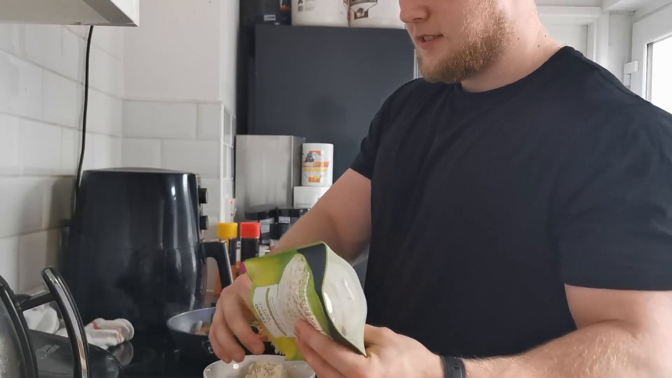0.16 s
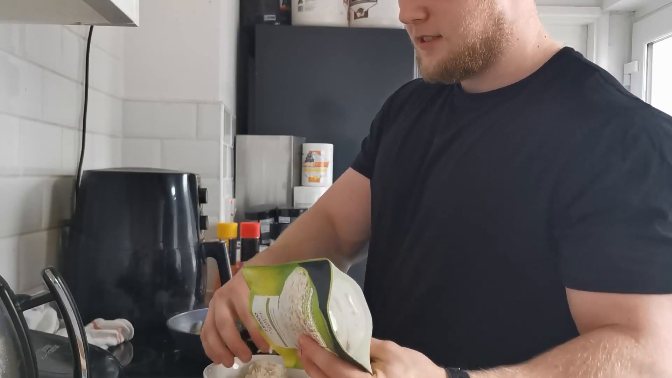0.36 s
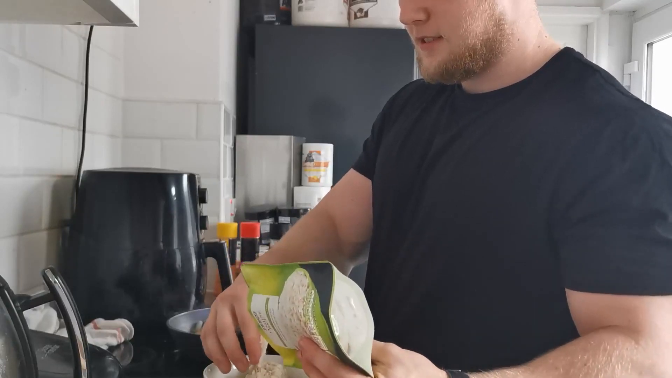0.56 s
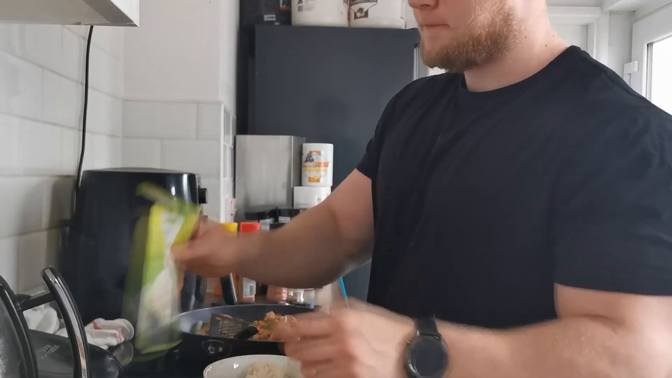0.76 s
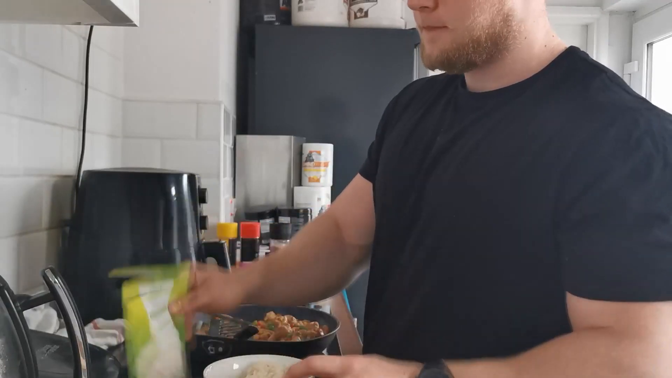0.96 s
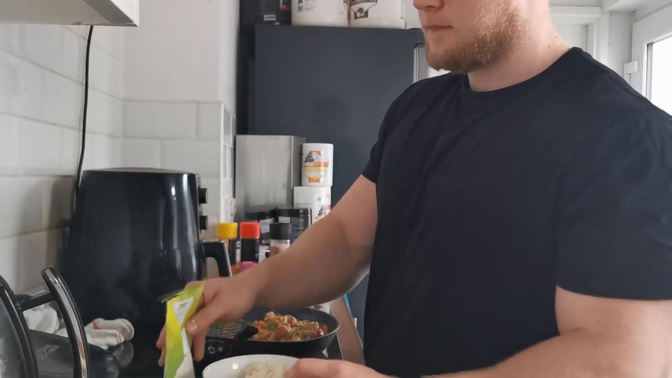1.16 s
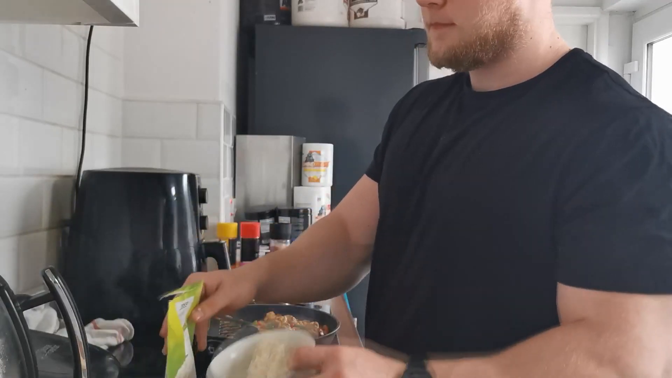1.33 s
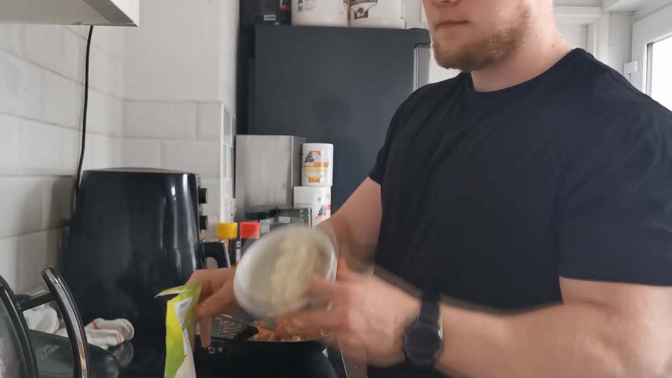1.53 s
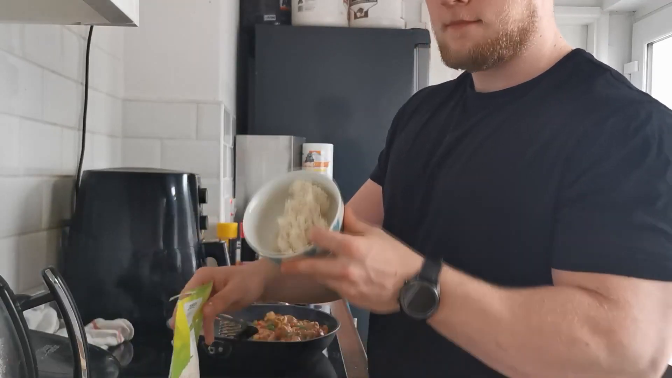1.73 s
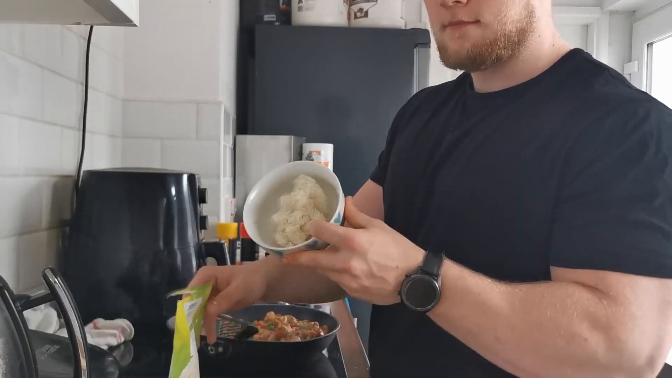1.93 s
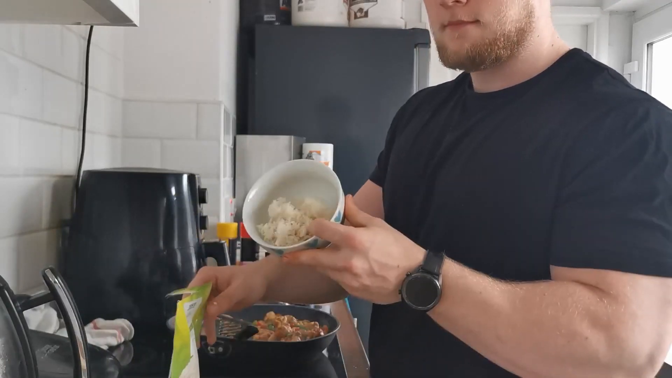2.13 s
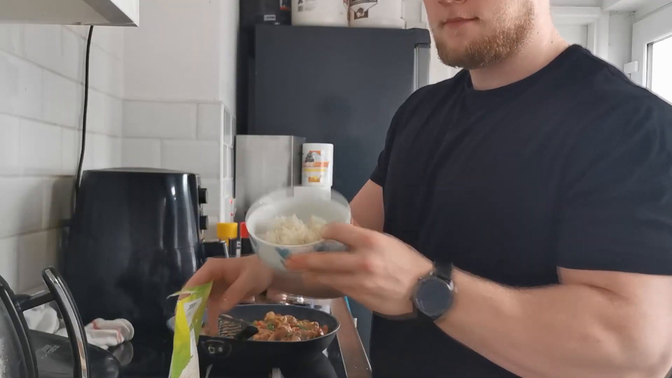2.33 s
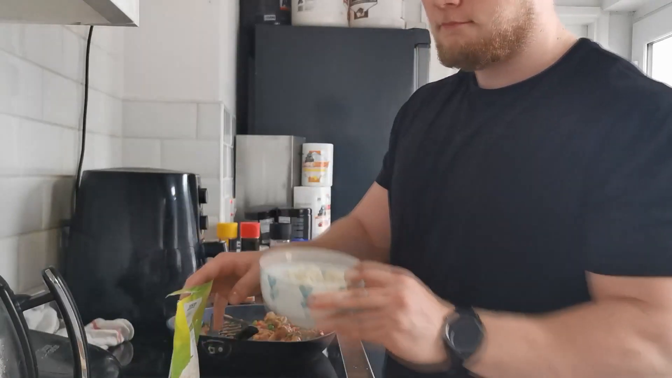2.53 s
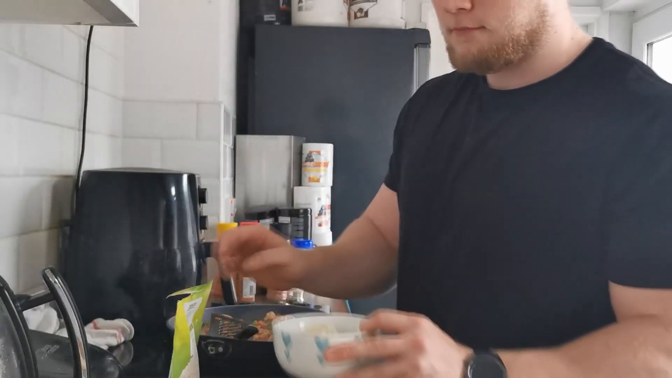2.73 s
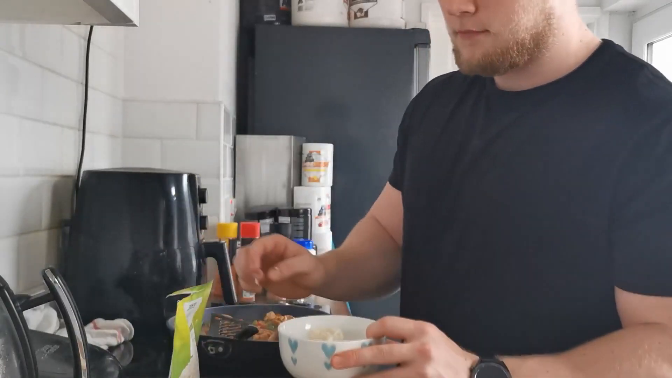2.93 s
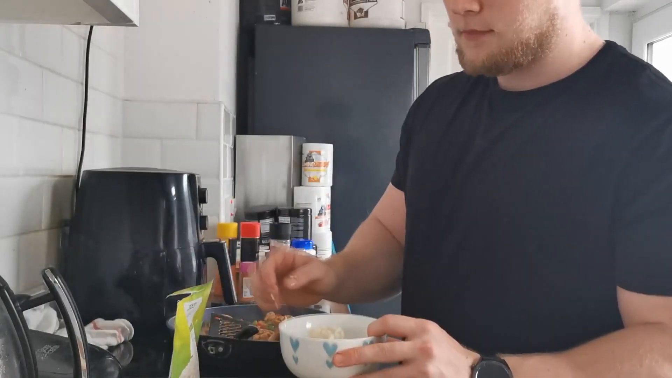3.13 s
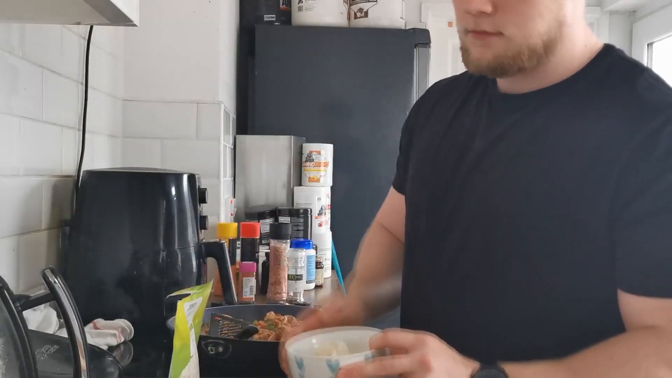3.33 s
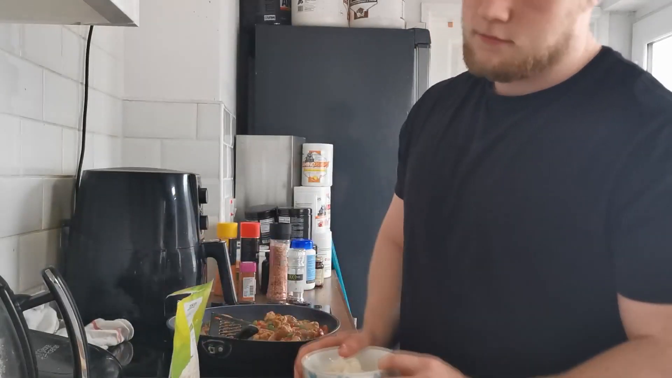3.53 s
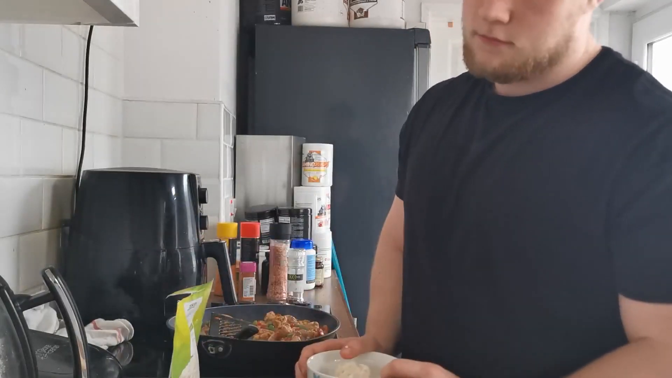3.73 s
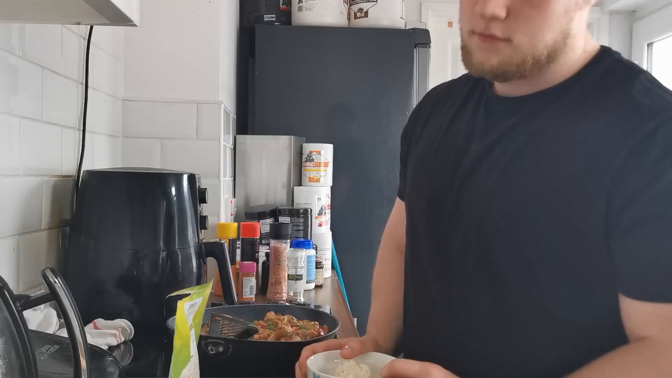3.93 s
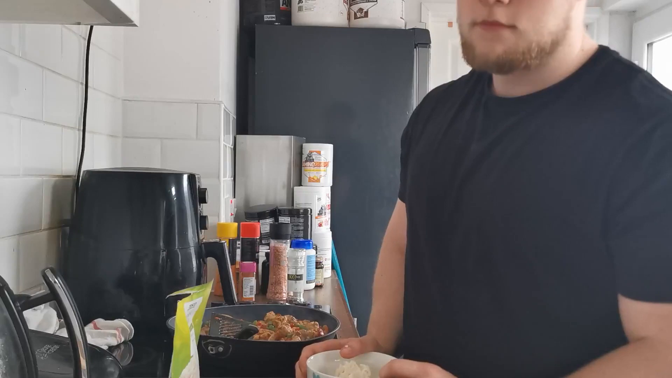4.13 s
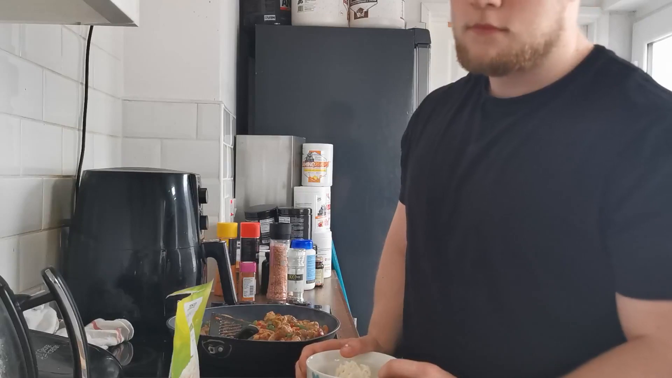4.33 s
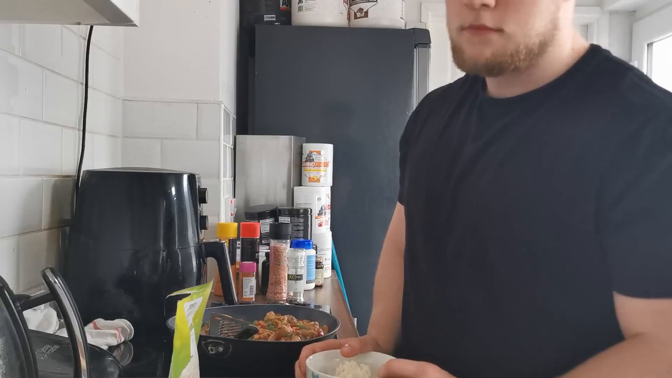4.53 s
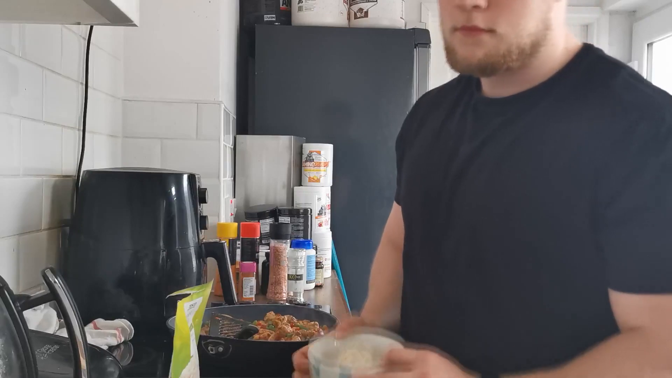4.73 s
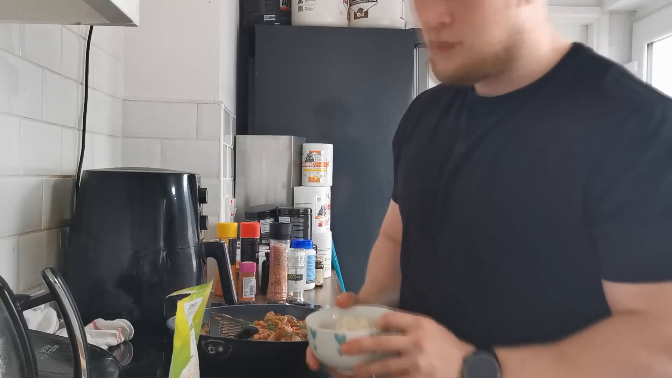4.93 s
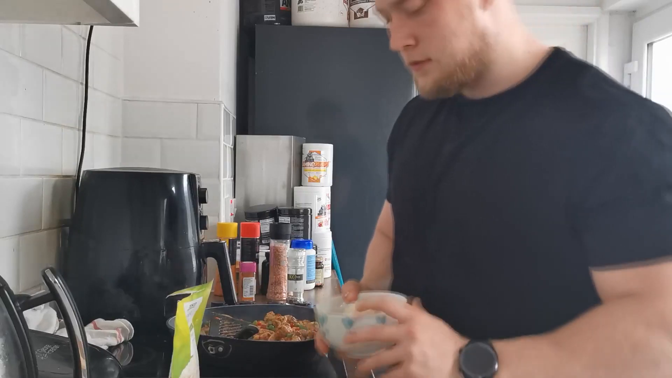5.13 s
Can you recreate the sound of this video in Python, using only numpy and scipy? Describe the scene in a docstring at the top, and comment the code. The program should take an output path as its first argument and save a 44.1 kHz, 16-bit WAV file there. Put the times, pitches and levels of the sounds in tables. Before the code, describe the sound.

Close in a tiled kitchen, a stiff plastic pouch snaps and crinkles in short irregular bursts, then bumps onto the worktop. Faint china and pan ticks follow during a quieter pause. A dense crackle and a heavy bowl thud come late, then near quiet. Low hob or fan hum continues throughout; stereo microphone nearby, right side brighter than left.

```python
"""First you hear rice squeezed out of a stiff plastic pouch in a tiled kitchen: folds snap, film rustles.
The pouch is shaken and stood on the worktop. A china bowl is tipped over a pan, then lands with a thud
amid crackling plastic. Plastic sounds are bursts of tiny clicks; worktop, bowl and pan are dying sines.
Behind them the hob hums and whines faintly: wavering sines over shaped noise. The two microphone ports
differ in colour."""
import sys
import numpy as np
from scipy import signal
from scipy.fft import rfft, irfft, next_fast_len
from scipy.io import wavfile
from scipy.ndimage import uniform_filter1d

SR = 44100
rng = np.random.default_rng(int(sys.argv[2]) if len(sys.argv) > 2 else 0)


def output_pcm(signal):
    """Save a mono or channel-first signal as 16-bit PCM at the path in sys.argv[1].

    Samples are clipped to [-1, 1] before scaling.
    """
    pcm = np.clip(np.atleast_2d(signal).T, -1, 1) * 32767
    wavfile.write(sys.argv[1], SR, np.round(pcm).astype(np.int16))


N = 227987
TIME = np.arange(N) / SR   # t/s

# ways a crease gives: (build-up t/s, fade t/s, first click level/dB)
FLIP = (0.0001, 0.00041, 0)
CRACK = (0.0004, 0.0015, -2.44)
CRUMPLE = (0.00081, 0.0092, -3)
CREEP = (0.0055, 0.0044, -14)
# snaps of creased film and short contacts of fingers and rice, each with two resonances:
# (t/s, level/dB, treble/dB, lower f/Hz, its level/dB, upper f/Hz, its level/dB, way it gives)
SNAPS = [(0.009, -25, 2, 1100, 1, 2200, 12, CRACK), (0.0284, -14.5, -31, 1820, 12.5, 2400, 12.5, CRACK),
         (0.0395, -13, -21, 1940, 6, 3000, 4, CRACK), (0.059, -8.5, -2, 1710, 11.5, 2250, 7.5, CRACK),
         (0.0705, -14, 10.5, 1600, 12.5, 2400, -3, CRACK), (0.080, -16, 6, 1400, -1, 3200, 8, FLIP),
         (0.093, -21, 13, 1900, 4, 4700, 2, CRACK), (0.131, -30, 4, 1300, 6, 2100, 7, CRACK),
         (0.1541, -17, 5, 1400, 10, 2550, 2, CRACK), (0.1909, -5.5, -1.5, 600, 0, 2150, 12.5, CRACK),
         (0.203, -21.5, 3, 800, 13, 2150, 3, CRACK), (0.233, -20, 7, 980, 7, 2000, 13, FLIP),
         (0.301, -18.5, -4, 890, 6, 2000, 11, CRUMPLE), (0.3728, -8.5, -7, 483, 10, 2750, 10, CRACK),
         (0.381, -15, -21, 1120, 14, 1650, 15.5, CRACK), (0.573, -39, 18.5, 2300, 10, 4700, 3, FLIP),
         (0.6752, -9, 6, 1470, 3, 2350, 9, CREEP), (0.695, -24, -1, 1300, 5, 2400, -4, CRACK),
         (0.7142, 2.5, 1.5, 1580, 9.5, 2300, 7, FLIP), (0.947, -18, -14, 1340, 4, 2120, 9, CREEP),
         (0.9695, -18.5, -12, 2250, 12, 4700, 6.5, CRACK), (0.989, -16.5, -8, 910, 9.5, 2050, 18.5, CRACK),
         (0.999, -18, -5, 2100, 6, 4600, 8, CRACK), (1.013, -32, -4, 2300, 13, 4700, 8, CRACK),
         (1.041, -14, 9, 540, 11, 2600, 13, CRUMPLE), (1.069, -14.5, 10, 1700, -5, 3300, 8, CRACK),
         (1.1345, -8, -15, 844, 6, 2200, 2, FLIP), (1.1652, 0, 9.5, 397, 10, 1850, 6.5, CRUMPLE),
         (1.173, -8, -11, 1620, 14.5, 2700, 19.5, CRACK), (1.183, -2.5, -1, 506, 9, 1700, 13.5, CRUMPLE),
         (1.201, -10, -13, 603, 1, 1750, 21, CRACK), (1.221, -6, -13, 1750, 6, 4300, 14, FLIP),
         (1.242, -11.5, -2, 1100, -1, 1850, 8, CRACK), (1.410, -27, -14, 770, 21, 1530, 20, CREEP),
         (1.426, -24, -13, 716, 17.5, 1260, 15, CRUMPLE), (1.903, -31.5, -12, 1610, 18, 2700, 6, CREEP),
         (2.5095, -18.5, -9, 2160, 17, 4700, 10, CRACK),
         (2.5315, -19.5, -13, 1910, 15, 2800, 16.5, CRUMPLE), (2.543, -15, 0, 1140, 13, 2000, 14.5, CREEP),
         (3.412, -13.5, -24, 1670, 11, 2250, 16, CRACK), (3.423, -11.5, -19, 2010, 12, 2650, 10.5, CRUMPLE),
         (3.442, -18, 4.5, 1490, -4, 2400, 14, CREEP), (3.6162, 6, -3, 835, 7.5, 1830, 11.5, CRACK),
         (3.6185, 2, -1, 1070, 11.5, 3100, 11, CRACK), (3.630, -1, 8.5, 960, 6, 2200, -2, CRUMPLE),
         (3.640, -5.5, -2, 910, 11, 3200, 5, FLIP), (3.654, -7, -2, 1000, 8, 2050, 11, CRACK),
         (3.669, -1.5, -9, 600, 5, 1050, 12, CRACK), (3.699, 3.5, -1, 900, 5, 2200, 3, CRACK),
         (3.7145, 1, 7, 800, -1, 2300, 1, CRUMPLE), (3.7185, 6, 0, 780, 9, 2000, 2, CRACK),
         (3.739, -2, 1, 860, 7, 2200, 3, CRACK), (3.777, 1, -21, 510, 15, 1600, 7, CRACK),
         (3.785, -3.5, 10.5, 990, 19.5, 10800, 12, CREEP), (3.790, -1, -8, 990, 6, 2100, 11, CRACK),
         (3.808, -4, 1, 604, 5, 2300, 8, CRACK), (3.8235, 1.5, 7.5, 700, -1, 1120, 6, CRACK),
         (3.8365, -0.5, 14, 2420, 10, 3800, 1, CRACK), (3.851, -3.5, 5, 900, 2, 2300, 6, CRACK),
         (5.151, -20.5, 24, 2510, 12, 4200, 18.5, CREEP), (5.1598, -21.5, 23, 1430, -5, 4200, 23, FLIP),
         (5.1648, -19, 22, 2410, 9, 3500, 24.5, CRACK)]
PANEL_Q = (4.3, 4.3)   # sharpness of the lower and upper resonance of the film beside a crease
BEAMED_SHARE = 0.22   # share of the panels' ring that bypasses the room

# film, fingers and rice rubbing: (start t/s, length t/s, level/dB, treble/dB)
RUBS = [(0, 0.0029, -37.5, -23), (0.067, 0.1, -43, -0.5), (0.233, 0.14, -50, -8),
        (0.67, 0.096, -52.5, 16.5), (0.965, 0.062, -41, -18), (1.025, 0.054, -36.5, -1),
        (1.154, 0.068, -30, -5.5), (1.239, 0.089, -41.5, -8.5), (1.374, 0.019, -49, -29),
        (1.54, 0.32, -80, 20), (1.861, 0.052, -52, -19), (2.26, 0.054, -62, -25), (2.541, 0.13, -53.5, -22),
        (3.608, 0.053, -33.5, 8.5), (3.792, 0.021, -25.5, 4), (3.863, 0.083, -39.5, 1.5),
        (4.86, 0.48, -81.5, 24)]
RUB_SWELL_SHARE = 0.28   # a rub swells over this share of its length, then holds
RUB_FADE_DB_PER_S = 294   # after its length it dies away at this rate
# larger buckles in a rub: range of pitches f/Hz, level/dB, sharpness
BUCKLE_HZ, BUCKLE_RING_DB, BUCKLE_Q = (1394, 4790), -11.5, 9.4
# what the film radiates: (f/Hz, level/dB)
FILM_COLOUR = [(40, -30), (150, -10), (350, -1), (550, -0.5), (800, -3), (1100, -6.5), (1700, -7.5),
               (2300, -9), (3200, -10), (5000, -8.5), (6800, -14.5), (10000, -17.5), (16000, -16)]

# what strikes the worktop: (brightness of the contact f/Hz, weight of the bass level/dB)
RICE, POUCH, BOWL_EDGE, BOWL_FOOT = (710, 13), (520, -10), (930, 13.2), (730, 0.65)
# blows on the worktop: (t/s, level/dB, what strikes)
KNOCKS = [(0.217, -52.5, RICE), (0.284, -52.5, RICE), (0.374, -47, POUCH), (0.714, -50, POUCH),
          (1.039, -32, POUCH), (1.046, -33, POUCH), (1.058, -40, POUCH), (1.167, -30, POUCH),
          (1.188, -36, POUCH), (3.617, -34.5, BOWL_EDGE), (3.666, -33, BOWL_EDGE),
          (3.697, -29.5, BOWL_FOOT), (3.720, -30, BOWL_FOOT), (3.7764, -15.5, BOWL_FOOT),
          (3.7834, -27, BOWL_FOOT), (3.801, -30, BOWL_FOOT), (3.821, -33.5, BOWL_EDGE)]
# ringing tones of the worktop with what stands on it, before the bass weight:
# (f/Hz, level/dB, time to fall 60 dB t/s)
WORKTOP_MODES = [(66, -7.5, 0.06), (82, -5, 0.05), (104.7, -9, 0.18), (135, -14.5, 0.23),
                 (179, -15.5, 0.13), (226, -1.5, 0.043), (286, -6.5, 0.07), (359, -2, 0.098),
                 (418, -7, 0.055), (489, 4, 0.039), (548, 1.5, 0.045), (671, -4.5, 0.054), (769, -5, 0.074),
                 (900, -6.5, 0.0224), (1050, -2.5, 0.045)]

# fingers on china: (t/s, level/dB)
BOWL_TOUCHES = [(2.303, -58.5), (2.318, -62), (2.39, -67)]
# ringing tones of the bowl: (f/Hz, level/dB, time to fall 60 dB t/s)
BOWL_MODES = [(1576, -12, 0.06), (3990, -1, 0.047), (7220, -13, 0.079)]
# light bumps against the pan: (t/s, level/dB)
PAN_TOUCHES = [(2.532, -49.5), (2.541, -59.5)]
# ringing tones of the pan: (f/Hz, level/dB, time to fall 60 dB t/s)
PAN_MODES = [(746, 1, 0.15), (1085.5, 0, 0.12), (1410, -7, 0.1), (1685, -6, 0.17), (1950, 0, 0.22),
             (2314, -17.5, 0.4), (2810, -11, 0.089)]

# how long the room rings: (f/Hz, time to fall 60 dB t/s)
ROOM_T60 = [(100, 0.46), (400, 0.28), (1000, 0.41), (2000, 0.35), (5000, 0.33), (10000, 0.28),
            (16000, 0.16)]
# left-right correlation of diffuse sound: (f/Hz, correlation from -1 to 1)
LIKENESS = [(110, 0.94), (190, 1), (300, 0.74), (600, 0.63), (1200, 0), (3000, 0)]
# lines of hob and fan, before a trim they share: (f/Hz, rms level/dB)
HUM_LINES = [(129.2, -68.5), (166.9, -68.5), (484.5, -73), (667.5, -80.5), (4086, -79.5)]
# kitchen air and cooling fan, before the ports' colour: (f/Hz, level per Hz/dB)
AIR_COLOUR = [(15, -95), (28, -100), (45, -77.5), (60, -100), (84, -86.5), (105, -85), (175, -81.5),
              (270, -90), (520, -96.5), (850, -104), (1500, -110), (4200, -111), (6500, -116),
              (13300, -118), (14300, -134)]
# colour of the left microphone port: (f/Hz, level/dB)
LEFT_PORT = [(200, -2.5), (320, -6.5), (560, -6.5), (1000, -1.5), (2200, -2.5), (4000, -2), (8200, 2),
             (10000, -8), (12500, -13.5), (16000, -26)]
# colour of the right microphone port: (f/Hz, level/dB)
RIGHT_PORT = [(200, -2), (320, -3), (620, 2.5), (2200, 4.5), (4000, 0.5), (7300, -0.5), (9100, 14.5),
              (9900, 12), (10800, 11.5), (12200, 3.5), (16000, -7)]
CUTOFF_HZ = 16100   # the ports' sound is cut above this


def snaps(scatter_s=0.003, straight_db=-7, ring_db=1.0):
    """A crease gives in a dying run of small buckles and rings the panels beside it; cracks, rings apart."""
    cracks, rings = np.zeros((2, N)), np.zeros((2, N))
    age = TIME[:SR // 10]
    for s, level_db, treble_db, low_hz, low_db, high_hz, high_db, (build_s, fade_s, first_db) in SNAPS:
        run = (1 - np.exp(-age / build_s)) * np.exp(-age / fade_s)
        force = unit_energy(crackle(len(age), per_s=3200, spread_db=5) * run + 1e-18)
        force[0] += from_db(first_db)
        # every crease faces its own way and reaches the ports by its own close reflections
        paths = unit_energy(diffuse(len(age)) * np.exp(-age / scatter_s))
        paths[:, 0] += from_db(straight_db)
        heard = signal.fftconvolve(force[None], paths, axes=1)[:, :len(age)]
        crack = from_db(level_db) * evened(heard)
        low_panel = from_db(low_db) * resonance(crack, low_hz, PANEL_Q[0])
        high_panel = from_db(high_db) * resonance(crack, high_hz, PANEL_Q[1])
        # half the treble change, twice: a steeper step
        half_bright = brightened(crack, treble_db / 2)
        add(cracks, s, brightened(half_bright, treble_db / 2))
        add(rings, s, from_db(ring_db) * (low_panel + high_panel))
    return cracks, rings


def rustle(per_s=380, spread_db=3, buckles_per_s=22):
    """Sliding film sheds small buckles, some heard alike at both ports; larger ones ring a panel each."""
    both, left, right = (crackle(N, per_s, spread_db) for _ in range(3))
    grains = both / 2 + np.array([left, right]) * np.sqrt(3) / 2
    rings = np.zeros(N)
    for hz in np.geomspace(*BUCKLE_HZ, 10):
        rings += resonance(crackle(N, buckles_per_s, spread_db), hz, BUCKLE_Q)
    grains = grains + from_db(BUCKLE_RING_DB) * rings / np.std(rings)
    out = np.zeros((2, N))
    for s, length, level_db, treble_db in RUBS:
        swell = np.clip((TIME - s) / (RUB_SWELL_SHARE * length), 0, 1)
        fade_db = RUB_FADE_DB_PER_S * np.clip(TIME - s - length, 0, 1)
        out += swell * from_db(level_db - fade_db) * brightened(grains, treble_db)
    return out


def knocks(bass_hz=200):
    """A soft blow sets the worktop's tones ringing; the striker's weight sets the level of the lowest."""
    out, click = np.zeros(N), signal.unit_impulse(SR // 2)
    for s, level_db, (contact_hz, bass_db) in KNOCKS:
        push = from_db(level_db) * low_pass(click, contact_hz, order=2)
        for k, (hz, mode_db, t60) in enumerate(WORKTOP_MODES):
            sign = (-1) ** k   # every other tone starts downwards
            gain = from_db(mode_db + bass_db * (hz < bass_hz))
            add(out, s, sign * gain * ring(push, hz, t60))
    return out


def pings(touches, modes):
    """Light touches ring a piece of damped kitchenware: each tone is a sine that dies away."""
    force = np.zeros(N)
    for s, level_db in touches:
        add(force, s, from_db([level_db]))
    return sum(from_db(mode_db) * ring(force, hz, t60) for hz, mode_db, t60 in modes)


def kitchen(x, tail_db, build_s=0.0028):
    """Direct sound, then a noisy tail off the tiles that dies at its own speed in each pitch band."""
    size = next_fast_len(2 * SR // 3)
    age, hz = TIME[:size], np.arange(size // 2 + 1) * SR / size
    field, tail = rfft(diffuse(size)), 0
    band_hz = np.array(ROOM_T60)[:, 0]
    for own_band, (_, t60) in zip(np.eye(len(ROOM_T60)), ROOM_T60):
        # each band blends into its neighbours
        share = at_hz(np.column_stack([band_hz, own_band]), hz)
        decay = np.exp(-np.log(1000) * age / t60)   # a factor of 1000 is 60 dB
        tail = tail + irfft(field * share, size) * decay
    tail = evened(tail * (1 - np.exp(-age / build_s)), width_hz=154)
    return x + from_db(tail_db) * signal.fftconvolve(x, tail, axes=1)[:, :N]


def hob(hum_db=-2, waver_hz=4):
    """Fan noise with a few motor lines and a thin whine, unsteady because their phase drifts at random."""
    hum = 0
    for hz, level_db in HUM_LINES:
        phase = np.cumsum(rng.standard_normal(N)) * np.sqrt(2 * np.pi * waver_hz / SR)
        peak = np.sqrt(2) * from_db(level_db + hum_db)
        hum = hum + peak * np.sin(2 * np.pi * hz * TIME + phase)
    air = coloured(diffuse(N), AIR_COLOUR) * np.sqrt(SR / 2)   # from level per Hz to full band
    return hum + air


def crackle(size, per_s, spread_db):
    """Tiny buckles at random moments, a few much larger than the rest; rms 1."""
    sizes_db = spread_db * np.minimum(rng.exponential(1, size), 4)
    heights = from_db(sizes_db) * rng.choice([-1, 1], size)
    clicks = heights * (rng.random(size) < per_s / SR)
    return clicks / np.sqrt(np.mean(clicks ** 2) + 1e-18)


def diffuse(size):
    """White noise at two close ports: alike in the bass, unrelated in the treble."""
    mid, side = rfft(rng.standard_normal((2, size)))
    alike = np.clip(at_hz(LIKENESS, np.arange(len(mid)) * SR / size), -1, 1)
    shared = np.sqrt((1 + alike) / 2) * mid
    opposed = np.sqrt((1 - alike) / 2) * side * [[1], [-1]]
    return irfft(shared + opposed, size)


def ring(force, hz, t60):
    """A unit click sets a sine of about height 1 ringing; it falls 60 dB in t60 seconds."""
    r, w = from_db(-60 / (t60 * SR)), 2 * np.pi * hz / SR   # shrink and turn per sample
    return signal.lfilter([0, np.sin(w)], [1, -2 * r * np.cos(w), r * r], force + 1e-18)


def resonance(x, hz, q):
    """Band-pass with gain 1 at its pitch, like a panel that favours one tone."""
    return signal.lfilter(*signal.iirpeak(min(hz, .45 * SR), q, fs=SR), x + 1e-18)


def evened(burst, width_hz=220):
    """Flatten a short burst's spectrum, keeping its grain in time; energy 1."""
    size = burst.shape[-1]
    for _ in range(3):
        spectrum = rfft(burst, 2 * size)
        power = uniform_filter1d(np.abs(spectrum) ** 2, round(2 * size * width_hz / SR))
        burst = irfft(spectrum / np.sqrt(np.abs(power) + 1e-12))[..., :size]
    return unit_energy(burst)


def unit_energy(x):
    """Scale each channel to energy 1."""
    return x / np.linalg.norm(x, axis=-1, keepdims=True)


def coloured(x, spectrum):
    """Filter with the given dB curve, acting as early as it can (minimum phase)."""
    size = 2 * next_fast_len(N)
    gain = from_db(at_hz(spectrum, np.arange(size // 2 + 1) * SR / size))
    # folding the cepstrum (spectrum of the log gain) forward leaves no sound ahead of its cause
    cepstrum = irfft(np.log(gain))
    cepstrum[1:size // 2] *= 2
    cepstrum[size // 2 + 1:] = 0
    return irfft(rfft(x, size) * np.exp(rfft(cepstrum)))[..., :N]


def brightened(x, treble_db, corner_hz=4500):
    """Raise or lower the treble above a corner."""
    body = low_pass(x, corner_hz)
    return body + from_db(treble_db) * (x - body)


def low_pass(x, hz, order=1):
    """Butterworth low-pass: dulls the sound above a pitch."""
    return signal.sosfilt(signal.butter(order, min(hz, .45 * SR), fs=SR, output="sos"), x + 1e-18)


def at_hz(points, hz):
    """Read a table between its points on a log-frequency axis."""
    known, values = np.transpose(points)
    return np.interp(np.log(np.maximum(hz, 1)), np.log(known), values)


def from_db(db):
    """Decibels to gain."""
    return 10 ** (np.asarray(db) / 20)


def add(track, s, sound):
    """Mix a sound in at a time in seconds."""
    start = max(round(s * SR), 0)
    track[..., start:start + sound.shape[-1]] += sound[..., :max(N - start, 0)]


def scene():
    """Plastic, bowl, pan and worktop fill the kitchen; flat panels beam part of their ring straight ahead."""
    cracks, rings = snaps()
    plastic = coloured(cracks + rustle() + (1 - BEAMED_SHARE) * rings, FILM_COLOUR)
    beamed = coloured(BEAMED_SHARE * rings, FILM_COLOUR)
    ware = pings(BOWL_TOUCHES, BOWL_MODES) + pings(PAN_TOUCHES, PAN_MODES)
    worktop = np.tile(knocks(), (2, 1))   # the same at both ports
    in_room = kitchen(plastic + ware, tail_db=1.17) + kitchen(worktop, tail_db=-0.5)
    return beamed + in_room + hob()


def record(dry):
    """Each port colours its side; a steep filter cuts the top."""
    ports = np.array([coloured(dry[0], LEFT_PORT), coloured(dry[1], RIGHT_PORT)])
    return signal.sosfilt(signal.ellip(10, .1, 80, CUTOFF_HZ, fs=SR, output="sos"), ports)


dry = scene()
out = record(dry)
output_pcm(out)
```